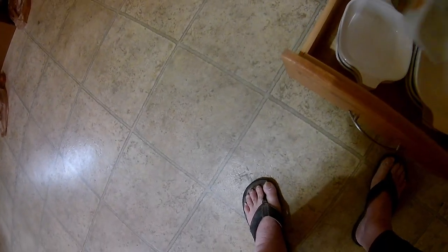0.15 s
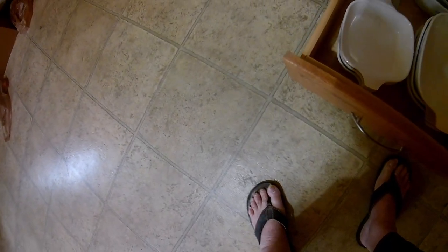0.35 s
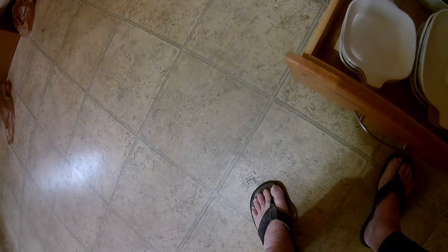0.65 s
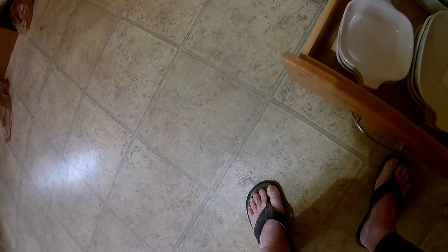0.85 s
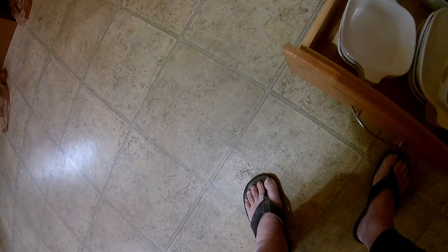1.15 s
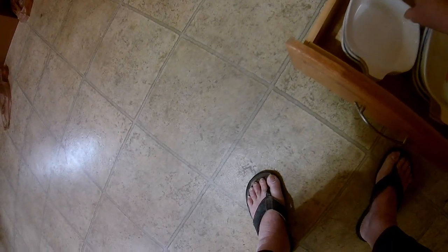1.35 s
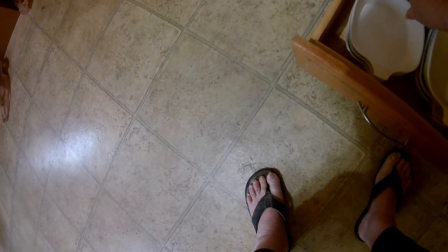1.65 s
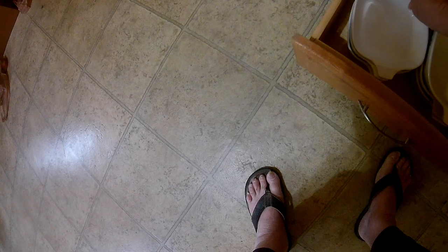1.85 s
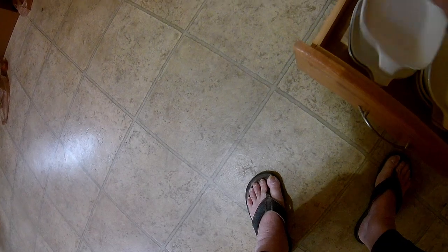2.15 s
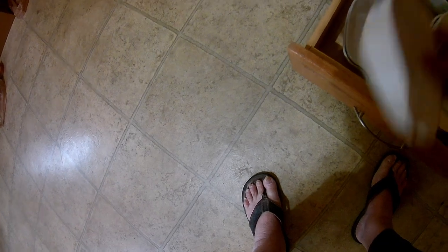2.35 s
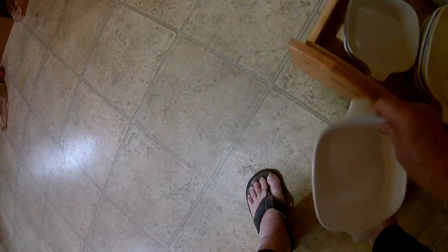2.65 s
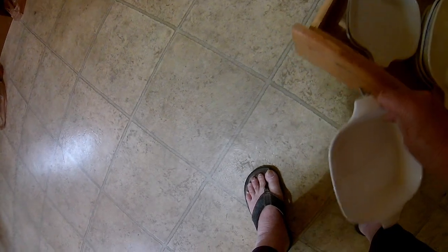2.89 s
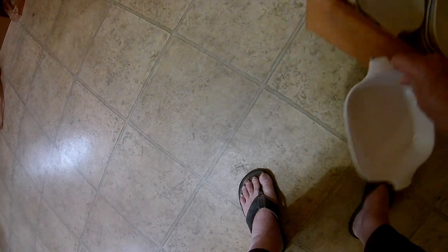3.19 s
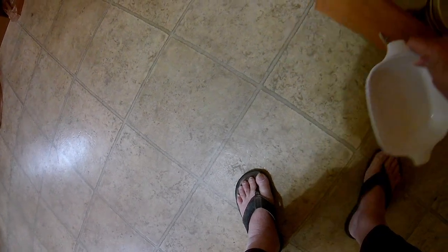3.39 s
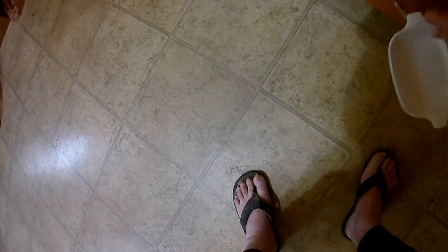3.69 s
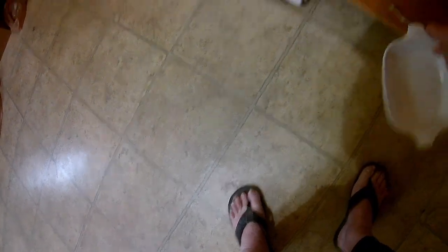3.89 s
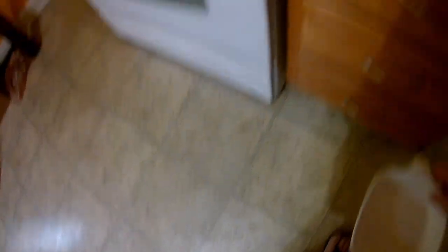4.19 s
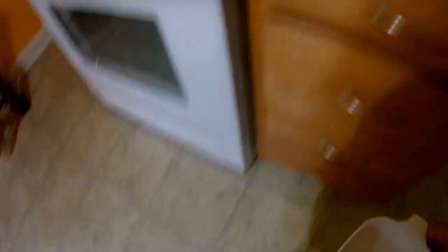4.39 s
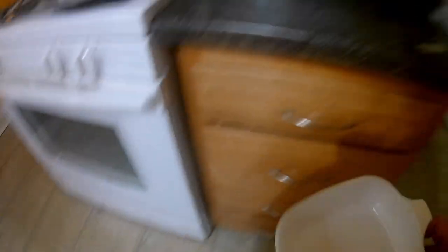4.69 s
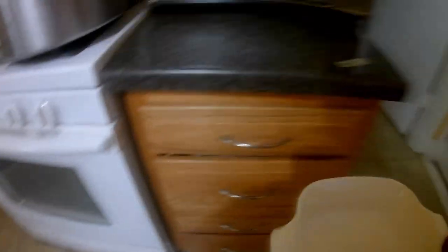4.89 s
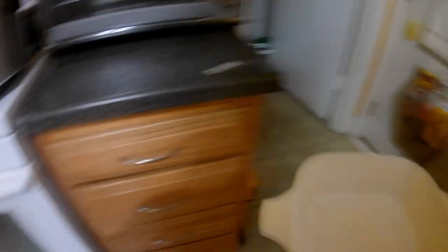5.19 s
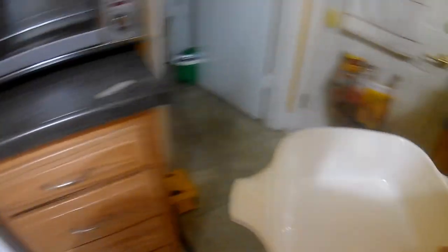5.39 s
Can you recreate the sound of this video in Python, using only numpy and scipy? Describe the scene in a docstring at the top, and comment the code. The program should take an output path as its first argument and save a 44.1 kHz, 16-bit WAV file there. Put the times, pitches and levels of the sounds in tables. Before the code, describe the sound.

A close view of someone taking dishes from a wooden kitchen drawer. At the start there is a brief glaze-on-glaze drag and tiny bumps. From 0.6 to 1.1 s ceramic knocks come in an uneven cluster, loudest around 1.0 s, short and hand-damped. Softer knocks follow from 1.5 to 2.1 s, the clearest near 1.8 and 2.0 s. A light bump at about 2.55 s precedes the drawer rolling shut from 2.7 s, a low wooden rumble with scraping lurches, small knocks and a very faint squeak near 3.5 s. At 3.85 s it bangs hard, contents rattling and a bowl ringing faintly, with a second thump at 4.1 s. Tiny ticks at 4.3 s, then quiet. Around 5.1 s a faint rustle, then from 5.2 s a jerk, dry clicks and even scraping as a drawer is pulled, with a thin squeak. Short room reverberation, faint refrigerator hum and soft air noise throughout.

```python
"""Dishes and a wooden drawer

Ceramic dishes lifted from a stack in a kitchen drawer knock together: impacts excite decaying modes.
The drawer rolls shut as shaped noise and bangs, its contents rattling as random contacts ring.
Later a drawer is pulled, in scraping resonant bands. A refrigerator hums faintly as steady sines
under air noise, and the hard-walled room answers the near sounds with a decaying tail of noise."""
import sys
import numpy as np
from scipy import signal
from scipy.fft import rfft, irfft
from scipy.io import wavfile

SR = 44100
rng = np.random.default_rng(int(sys.argv[2]) if len(sys.argv) > 2 else 0)


def store_pcm(level_fs):
    """Save levels as 16-bit WAV."""
    pcm = np.round(np.clip(level_fs, -1, 1) * 32767).astype(np.int16)
    wavfile.write(sys.argv[1], SR, np.atleast_2d(pcm).T)


N = 244314

# Knocks of the first dish on the stack: t/s, level/dB, low modes/dB, treble modes/dB, free ringing/s
FIRST_KNOCKS = [(0.002, -41, -18, -5, 0.025), (0.593, -12.5, 8, 3, 0.017), (0.622, -29, 4, -1, 0.0048),
                (0.639, -36, 0, 0, 0.022), (0.804, -21, 4, -8.5, 0.041), (0.832, -15.5, 6.5, 3.5, 0.035),
                (0.988, -4.5, 2, 1, 0.011), (1.002, -12, 2.5, 2.5, 0.012), (1.017, -13, 1, -2, 0.026),
                (1.025, -9, -1, -1, 0.014), (1.057, -15, 4.5, -1, 0.035), (1.068, -15, 1, -4.5, 0.0094),
                (1.104, -18, -14, -24.5, 0.014), (1.114, -33, 9, -8, 0.011)]
# Modes of the first dish: f/Hz, level/dB, T60/s
FIRST_MODES = [(233.7, -9.5, 0.05), (407, -6, 0.12), (439.4, -1.5, 0.14), (481, 2.5, 0.038),
               (710, -6, 0.034), (781, -14, 0.037), (983, -10.5, .05), (1090, -4, 0.1), (1162, -1.5, 0.098),
               (1232, 3.5, 0.056), (1436, -9, 0.02), (1786, -26.5, 0.5), (1897, -8.5, 0.014),
               (2210, -8, 0.054), (2420, -10.5, 0.2), (2528, -10.5, 0.18), (2664, -11.5, 0.096),
               (3325, -18.5, 0.086), (3850, -21, 0.052), (4425, -15.5, 0.052), (4535, -12.5, .09),
               (5063, -15, 0.069), (6070, -26, 0.13), (6370, -24.5, 0.098), (6900, -29, 0.065),
               (7500, -27.5, .1), (8650, -28.5, 0.12), (8730, -30, 0.098), (9180, -28, 0.078),
               (10650, -23, 0.055), (11300, -28.5, 0.021), (12010, -22.5, .04)]
# Knocks of the second dish: t/s, level/dB, low modes/dB, treble modes/dB, free ringing/s
SECOND_KNOCKS = [(1.494, -42, 12.5, -29, 0.022), (1.596, -31, 10.5, -1, 0.021),
                 (1.603, -36, 16.5, -14, 0.017), (1.613, -38, 17, -7.5, 0.028), (1.659, -43, 8, -22, 0.021),
                 (1.716, -37.5, 12.5, -12, 0.036), (1.742, -41, 9.5, -6, 0.034), (1.79, -43, 9, -2, 0.012),
                 (1.806, -22, 7, 3, 0.042), (1.849, -43, 16, 4, 0.019), (1.899, -37, 3.5, -9.5, 0.021),
                 (1.922, -37.5, 5.5, -10, 0.025), (1.99, -18.5, -4, 2.5, 0.01), (2.005, -23, 1.5, 0, 0.005),
                 (2.014, -27, -5, -7, 0.0097), (2.049, -34, 0, -11, 0.023), (2.068, -38, -1, -9, 0.0195)]
# Modes of the second dish: f/Hz, level/dB, T60/s
SECOND_MODES = [(217, -12, 0.051), (282, -4.5, 0.064), (386, -0.5, 0.033), (450, 1, 0.036),
                (604, -4.5, 0.022), (753, -2.5, 0.045), (799, -6, 0.11), (1074, 3, 0.039),
                (1272, -3, 0.046), (1330, -7, 0.042), (1394, -7, 0.039), (1830, -12, 0.053),
                (2210, -12, 0.02), (2610, -12, 0.041), (3293, -16, 0.037), (3520, -16.5, 0.055),
                (3670, -11.5, 0.054), (3970, -7, 0.024), (4514, -11.5, 0.034), (5100, -14.5, 0.054),
                (6040, -17, 0.064), (6470, -23, 0.081), (6990, -21.5, 0.065), (8700, -23, 0.037),
                (9200, -28, 0.058), (10900, -29, 0.028)]
# Bumps of the wooden drawer: t/s, level/dB, low modes/dB, treble modes/dB
DRAWER_KNOCKS = [(0.059, -33, 1, -4), (0.121, -43, 9, -19), (0.141, -43.5, 18.5, -15),
                 (0.17, -39, 15.5, -10), (2.533, -33.5, 13, -14), (2.588, -25.5, -8.5, 2.5),
                 (2.913, -29.5, 4, -24), (2.954, -36, 12.5, -32), (3.044, -31.5, 6, -3),
                 (3.096, -32, -1, 3.5), (3.182, -31.5, 9, -2), (3.205, -27, 10, 11.5),
                 (3.262, -26.5, 8.5, 4), (3.614, -27.5, 1, -7.5), (3.662, -27.5, 2, 3.5),
                 (3.713, -29.5, -6, 5.5), (3.848, 0.5, 4, -7), (3.865, -4, 3.5, 5.5), (3.896, -11, 10, -1),
                 (3.924, -8, 6, 6.5), (3.974, -18.5, 7, 5), (4.085, -5.5, -4, -22), (4.122, -10, -4, -11),
                 (4.154, -27.5, -5, 2), (5.196, -30, 2.5, -4), (5.244, -38.5, 8.5, 0),
                 (5.414, -33, -10, 1.5)]
# Modes of the drawer: f/Hz, level/dB, T60/s
DRAWER_MODES = [(92, -15.5, 0.05), (138, -7, 0.04), (277, 0, 0.036), (400, 2, 0.046), (480.3, -2, 0.089),
                (599, -5, 0.082), (686, -2, 0.054), (830, -8, 0.035), (1010, -8, 0.11), (1141, 2.5, 0.034),
                (1270, -8.5, 0.035), (1390, -37, 0.029), (1826, -20.5, 0.072), (2230, -34, .04),
                (2400, -17, 0.022), (3200, -45.5, 0.01), (4113, -16, 0.04), (4330, -24.5, 0.036),
                (4630, -19.5, 0.017), (6320, -24, 0.027), (7000, -42.5, .03), (10420, -29, 0.06)]
# Jolts of a bowl left in the drawer: t/s, level/dB, low modes/dB, treble modes/dB, free ringing/s
BOWL_KNOCKS = [(3.874, -30.5, -4, 6.5, 0.0068), (3.888, -26, -4, 2.5, 0.018), (4.07, -51, 0, 10.5, 0.03),
               (4.155, -37.5, 4, -9, 0.44)]
# Modes of the bowl: f/Hz, level/dB, T60/s
BOWL_MODES = [(1795, -2.5, 0.45), (1880, -4, .35), (2590, 3.5, 0.13), (3610, -9, .08), (3990, 1, 0.13),
              (4600, -10, 0.13), (4930, -4.5, .12), (5270, -13, 0.086)]
# Spectrum of the crack in every knock: f/Hz, relative density/dB
CRACK_SPECTRUM = [(100, -25.5), (300, 3.5), (1200, 3), (2500, -9), (3000, -14.5), (5000, -12),
                  (7500, -26.5), (8200, -36), (10700, -28.5), (11800, -33.5), (13000, -57.5)]
TREBLE_SHARE = 0.7  # part of the treble change that reaches the 2-3 kHz modes

# Cabinet booms as the drawer hits home: t/s, f/Hz, level/dB, T60/s
CABINET_BOOMS = [(3.849, 90.6, -16.5, .3), (3.847, 104.5, -19.5, 0.11)]

# Spectrum of the rattling contents: f/Hz, relative density/dB
RATTLE_SPECTRUM = [(35, -44.5), (60, -11.5), (128, -1.5), (365, -17), (488, -0.5), (910, -20.5),
                   (1190, -9.5), (2590, -23), (2900, -28.5), (3880, -22.5), (7910, -52.5), (10800, -57),
                   (12400, -48), (16100, -89), (22000, -120)]
BANG_S = 3.845
JUMP_DB, JUMP_HOLD_S, JUMP_FADE_DB_PER_S = -21, 0.067, 301.5  # the first jumping
SETTLE_DB, SETTLE_HOLD_S, SETTLE_FADE_DB_PER_S = -31.5, 0.18, 85.5  # slower settling under it

# Rumble of the drawer rolling shut, following its speed: t/s, level/dB
ROLL_SHUT = [(2.7, -72.5), (2.83, -57.5), (2.93, -46), (3.16, -48), (3.35, -48.5), (3.46, -41.5),
             (3.53, -43), (3.7, -41), (3.76, -41), (3.83, -45)]
# Lurches of the drawer on its runners: t/s, hold/s, rumble level/dB, scraping level/dB
LURCHES = [(3.084, .02, -58.5, -52.5), (3.189, .025, -40, -45), (3.243, .025, -45, -49),
           (3.595, .015, -39, -53.5), (3.675, .05, -48, -47.5)]
LURCH_ATTACK_S, LURCH_FADE_DB_PER_S = 0.013, 300.5
# Spectrum of the rolling rumble: f/Hz, relative density/dB
RUMBLE_SPECTRUM = [(18, -36), (30, -18.5), (86, 2.5), (135, 8), (189, -2), (279, 3), (485, -4), (600, -7),
                   (780, -38.5), (1320, -120)]
# Spectrum of the scraping while rolling: f/Hz, relative density/dB
SCRAPE_SPECTRUM = [(180, -35.5), (300, -4.5), (897, -10), (1380, -12.5), (1990, -24), (2200, -21),
                   (3100, -35.5), (4880, -35), (9000, -52.5), (11700, -82), (19800, -120)]
SCRAPE_UNDER_DB = -11  # rolling scrape relative to the rumble
# Resonant bands of the pulled drawer: f/Hz, bandwidth/Hz
PULL_BANDS = [(380, 135), (1120, 310)]
# Even sliding in each of those bands, in order: level/dB
SLIDE_DB = (-60, -54.5)
PULL_S, JERK_DB, JERK_FADE_DB_PER_S = 5.195, -39, 255  # the pull starts with a low jerk

# Thin squeaks of a runner: t/s, hold/s, first f/Hz, last f/Hz, level/dB, noise width/Hz
SQUEAKS = [(3.52, 0.29, 5540, 5550, -70, 170), (5.201, .31, 5310, 5780, -71.5, 60)]
SQUEAK_ATTACK_S, SQUEAK_FADE_DB_PER_S = 0.03, 298.5

# A dish drags on the stack: t/s, level/dB
DRAGS = [(0.0, -41), (0.058, -50), (0.12, -58), (0.165, -60.5)]
DRAG_ATTACK_S, DRAG_HOLD_S, DRAG_FADE_DB_PER_S = 0.0035, 0.0086, 300
# Spectrum of the dragging: f/Hz, relative density/dB
DRAG_SPECTRUM = [(88, -49), (150, -16), (254, 0.5), (356, -2.5), (845, -27.5), (1240, -14), (1540, -26),
                 (1770, -13), (2300, -33.5), (6000, -37), (7800, -70), (13200, -120)]
RUSTLE_S, RUSTLE_DB, RUSTLE_ATTACK_S, RUSTLE_FADE_DB_PER_S = 5.1, -63.5, 0.13, 33

# Small dry ticks: t/s, envelope peak level/dB, f/Hz, fade time constant/s
TICKS = [(0.182, -58, 4330, 0.00085), (0.193, -57.5, 5470, .001), (2.588, -41.5, 3610, 0.00051),
         (3.041, -63, 3600, .001), (3.201, -38, 5000, 0.00056), (3.663, -49, 4780, 0.00096),
         (4.293, -48, 5800, 0.00051), (4.298, -45, 4680, 0.00026), (5.203, -31, 1023, 0.0011),
         (5.408, -27, 904, 0.0013), (5.408, -40, 2190, 0.00073)]

# Reverberation of the room: f/Hz, T60/s
ROOM_T60 = [(60, 0.14), (300, 0.38), (1000, 0.42), (4000, 0.44), (12000, .25)]
ROOM_DB, ROOM_RISE_S = -12, 0.015

# Compressor lines: f/Hz, rms level/dB about which each wavers
HUM = [(236.9, -83.5), (296.1, -80), (414.5, -78.5), (473.7, -68), (710.6, -79.5)]
# Spectrum of room air and hiss: f/Hz, relative density/dB
AIR_SPECTRUM = [(15, -19.5), (25, -3), (60, -4), (160, -7.5), (300, -11), (480, -10.5), (600, -14.5),
                (1150, -17), (1600, -25), (2800, -30.5), (7000, -35), (9500, -36), (10800, -30),
                (12500, -40)]
AIR_DB = -61  # rms level about which the air noise swells
CUTOFF_HZ = 12500


def struck(knocks, modes, level_db, crack_db, chatter_s, low_cut_hz, vary_db, held_db=0):
    """Modal superposition: each impact rings all modes; where it lands sets their low and treble shares."""
    t = np.arange(SR // 2) / SR
    hz, mode_db, t60 = np.transpose(modes)
    bank = amp(-60 * t / t60[:, None]) * np.sin(2 * np.pi * hz[:, None] * t)
    group = np.searchsorted([650, 2000, 3000], hz)
    sign = (-1) ** np.arange(len(hz))
    noise = colour(rng.standard_normal(N), CRACK_SPECTRUM)
    out = np.zeros(N + len(t))
    for s, knock_db, low_db, treble_db, *free_s in knocks:
        share_db = np.array([low_db, 0, TREBLE_SHARE * treble_db, treble_db])[group]
        strength_db = level_db + mode_db + share_db + rng.normal(0, vary_db, len(hz))
        sound = (sign * amp(strength_db)) @ bank
        # rims never meet once: weaker contacts follow the first within milliseconds
        contacts = rng.random(2000) < 900 / SR
        chatter = 0.29 * rng.standard_normal(2000) * contacts * np.exp(-t[:2000] / chatter_s)
        chatter[0] = 1
        sound = signal.fftconvolve(sound, chatter)[:len(t)]
        # the many short modes between the clear ones merge into a crack of noise
        crack_gain = amp(crack_db + treble_db) * np.exp(-t / (1.74 * chatter_s))
        sound += crack_gain * np.roll(noise, rng.integers(N))[:len(t)]
        if free_s:  # the dish comes to rest against hand or stack, which damps it
            sound *= amp(held_db * np.clip((t - free_s[0]) / 0.012, 0, 1))
        i = round(s * SR)
        out[i:i + len(t)] += amp(knock_db) * sound
    return highpass(out[:N], low_cut_hz)


def boom():
    """Free decay of low panel modes: each is a sine that starts from zero and dies exponentially."""
    out = np.zeros(N)
    for s, hz, level_db, t60 in CABINET_BOOMS:
        t = np.maximum(np.arange(N) / SR - s, 0)
        out += amp(level_db - 60 * t / t60) * np.sin(2 * np.pi * hz * t)
    return out


def rattle():
    """Random excitation: loose things jump at once, heard bare and through the drawer's modes."""
    jump = stroke(BANG_S, JUMP_DB, 0.0026, JUMP_HOLD_S, JUMP_FADE_DB_PER_S)
    settle = stroke(BANG_S, SETTLE_DB, 0.0025, SETTLE_HOLD_S, SETTLE_FADE_DB_PER_S)
    contacts = grains(350, 1.2)
    rung = np.zeros(N)
    for k, (hz, mode_db, t60) in enumerate(DRAWER_MODES):
        rung += (-1) ** k * amp(mode_db) * ring(contacts, hz, t60)
    bare = colour(grains(2500, 2.2), RATTLE_SPECTRUM)
    return (jump + settle) * (bare + 0.5 * rms_one(rung))


def drawer_roll():
    """Rolling noise: rollers rumble through the cabinet while the sides scrape in dense small catches."""
    s, roll_db = np.transpose(ROLL_SHUT)
    roll = amp(np.interp(np.arange(N) / SR, s, roll_db, -120, -120))
    rumble_lurch, scrape_lurch = np.zeros(N), np.zeros(N)
    for s, hold_s, rumble_db, scrape_db in LURCHES:
        rumble_lurch += stroke(s, rumble_db, LURCH_ATTACK_S, hold_s, LURCH_FADE_DB_PER_S)
        scrape_lurch += stroke(s, scrape_db, LURCH_ATTACK_S, hold_s, LURCH_FADE_DB_PER_S)
    rumble = colour(rng.standard_normal(N), RUMBLE_SPECTRUM)
    rumble = rumble * (roll + rumble_lurch) * amp(1.1 * drift(21))
    scrape = colour(grains(1300, 2.3), SCRAPE_SPECTRUM)
    scrape = scrape * (amp(SCRAPE_UNDER_DB) * roll + scrape_lurch) * amp(2.1 * drift(25))
    return rumble + scrape


def drawer_pull():
    """Resonant friction: small catches excite two bands, with a low jerk and then an even slide to the end."""
    catches = grains(2500, 1.8)
    low, high = [stroke(PULL_S, db, 0.0074, 1, 0) * amp(1.8 * drift(18)) for db in SLIDE_DB]
    low = low + stroke(PULL_S, JERK_DB, 0.0043, 0.0072, JERK_FADE_DB_PER_S)
    out = np.zeros(N)
    for (hz, width_hz), gain in zip(PULL_BANDS, (low, high)):
        t60 = np.log(1000) / (np.pi * width_hz)
        band = ring(ring(catches, hz, t60), hz, t60)  # twice: steep flanks
        out += gain * rms_one(band)
    return out


def squeak():
    """Quadrature modulation: two slow noises on a gliding pitch give a rough, broken band."""
    out, t = np.zeros(N), np.arange(N) / SR
    for s, hold_s, first_hz, last_hz, level_db, width_hz in SQUEAKS:
        pitch_hz = np.interp(t, [s, s + hold_s], [first_hz, last_hz])
        phase = 2 * np.pi * np.cumsum(pitch_hz) / SR
        gain = stroke(s, level_db, SQUEAK_ATTACK_S, hold_s, SQUEAK_FADE_DB_PER_S)
        gain = gain * amp(3.0 * drift(21))
        out += gain * (drift(width_hz) * np.sin(phase) + drift(width_hz) * np.cos(phase))
    return out


def handling():
    """Sliding friction: glaze drags over glaze in dense small catches; later a faint bright noise rustles."""
    drags = sum(stroke(s, db, DRAG_ATTACK_S, DRAG_HOLD_S, DRAG_FADE_DB_PER_S) for s, db in DRAGS)
    bright = bandpass(rng.standard_normal(N), 2500, 6000)
    rustle = stroke(RUSTLE_S, RUSTLE_DB, RUSTLE_ATTACK_S, 0, RUSTLE_FADE_DB_PER_S)
    return drags * colour(grains(1800, 1.6), DRAG_SPECTRUM) + rustle * rms_one(bright)


def ticks():
    """Critically damped envelope: each tick is one very short mode that swells and fades."""
    out, t = np.zeros(N), np.arange(800) / SR
    for s, peak_db, hz, fade_s in TICKS:
        i = round(s * SR)
        envelope = np.e * t / fade_s * np.exp(-t / fade_s)  # peak 1
        out[i:i + 800] += amp(peak_db) * envelope * np.sin(2 * np.pi * hz * t)
    return out


def kitchen(x):
    """Diffuse reverberation: reflections build up over hundredths of a second and die octave by octave."""
    t, tail = np.arange(SR) / SR, np.zeros(SR)
    edges = 50 * 2 ** np.arange(0, 8.5)
    for low, high in zip(edges, edges[1:]):
        band = bandpass(rng.standard_normal(SR), low, high)
        tail += band * amp(-60 * t / at_hz(ROOM_T60, np.sqrt(low * high)))
    tail = tail * (1 - np.exp(-(t / ROOM_RISE_S) ** 2))
    return signal.fftconvolve(x, tail / np.sqrt(np.sum(tail ** 2)))[:N]


def background():
    """Stationary floor: slightly wavering compressor lines over broad air noise."""
    t, hum = np.arange(N) / SR, np.zeros(N)
    for hz, rms_db in HUM:
        height = amp(rms_db + 3.0 + 1.5 * drift(1.4))  # a sine peaks 3 dB above its rms
        hum += height * np.sin(2 * np.pi * (hz * t + rng.random()))
    swell_db = 0.8 * drift(3)
    return hum + amp(AIR_DB + swell_db) * colour(rng.standard_normal(N), AIR_SPECTRUM)


def stroke(start_s, level_db, attack_s, hold_s, fade_db_per_s):
    """Exponential decay: a gain that rises, holds, then fades evenly in dB."""
    t = np.arange(N) / SR - start_s
    fade_db = fade_db_per_s * np.maximum(t - attack_s - hold_s, 0)
    return np.clip(t / attack_s, 0, 1) * amp(level_db - fade_db)


def ring(clicks, hz, t60):
    """Two-pole resonance: a unit click sets a decaying sine of starting height 1 ringing."""
    r, w = amp(-60 / (t60 * SR)), 2 * np.pi * hz / SR
    return signal.lfilter([0, np.sin(w)], [1, -2 * r * np.cos(w), r * r], clicks + 1e-18)


def grains(per_s, spread_db):
    """Poisson-like excitation: random clicks of uneven size and either sign."""
    sizes = amp(spread_db * np.minimum(rng.exponential(1, N), 4)) * rng.choice([-1, 1], N)
    return sizes * (rng.random(N) < per_s / SR)


def drift(rate_hz):
    """Low-passed noise: a slow random wander of rms 1."""
    r = np.exp(-2 * np.pi * rate_hz / SR)
    slow = signal.lfilter([1], [1, -2 * r, r * r], rng.standard_normal(N + SR))
    return rms_one(slow[SR:])  # the first second lets the filter settle


def colour(x, spectrum):
    """Spectral shaping: weights every frequency of x by a curve, then scales to rms 1."""
    gain = amp(at_hz(spectrum, np.fft.rfftfreq(N, 1 / SR)))
    return rms_one(irfft(rfft(x) * gain, N))


def at_hz(points, hz):
    """Logarithmic frequency scale: reads a curve linearly along log f."""
    f, v = np.transpose(points)
    return np.interp(np.log(np.maximum(hz, 1)), np.log(f), v)


def bandpass(x, low_hz, high_hz):
    """Band selection: a Butterworth filter keeps what lies between two frequencies."""
    return signal.sosfilt(signal.butter(2, [low_hz, high_hz], "band", fs=SR, output="sos"), x)


def highpass(x, hz):
    """Bass removal: a second-order Butterworth filter weakens what lies below hz."""
    return signal.sosfilt(signal.butter(2, hz, "high", fs=SR, output="sos"), x)


def rms_one(x):
    """Power normalisation: scales to rms 1."""
    return x / np.sqrt(np.mean(x ** 2) + 1e-20)


def amp(db):
    """Decibel law: amplitude gain of a level in dB."""
    return 10 ** (np.asarray(db) / 20)


def scene():
    """Linear superposition: the near sources, their room response and the steady floor add."""
    dishes = struck(FIRST_KNOCKS, FIRST_MODES, level_db=-9.0, crack_db=-14, chatter_s=0.012,
                    low_cut_hz=130, vary_db=0.83, held_db=-17)
    dishes += struck(SECOND_KNOCKS, SECOND_MODES, level_db=-9.5, crack_db=-11.0, chatter_s=0.0096,
                     low_cut_hz=170, vary_db=3.24, held_db=-15)
    drawer = struck(DRAWER_KNOCKS, DRAWER_MODES, level_db=-18.0, crack_db=-20.5, chatter_s=0.012,
                    low_cut_hz=42, vary_db=2.9)
    bowl = struck(BOWL_KNOCKS, BOWL_MODES, level_db=-4.0, crack_db=-17.5, chatter_s=0.0078,
                  low_cut_hz=900, vary_db=1.2, held_db=-11.5)
    near = dishes + drawer + bowl + boom() + rattle()
    near += drawer_roll() + drawer_pull() + squeak() + handling() + ticks()
    near = highpass(near, 65)  # thins the deep bass of all near sounds
    return (near + amp(ROOM_DB) * kitchen(near) + background())[None]


def record(dry):
    """Band limitation: a steep Chebyshev low-pass cuts the top."""
    return signal.sosfilt(signal.cheby2(16, 50, CUTOFF_HZ, fs=SR, output="sos"), dry)


dry = scene()
out = record(dry)
store_pcm(out)
```